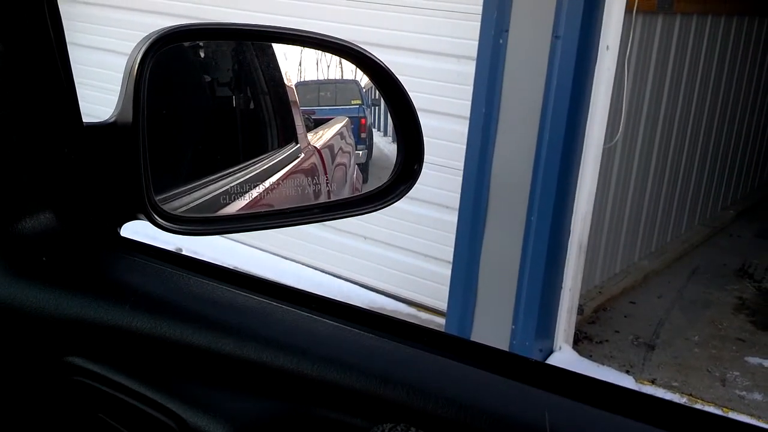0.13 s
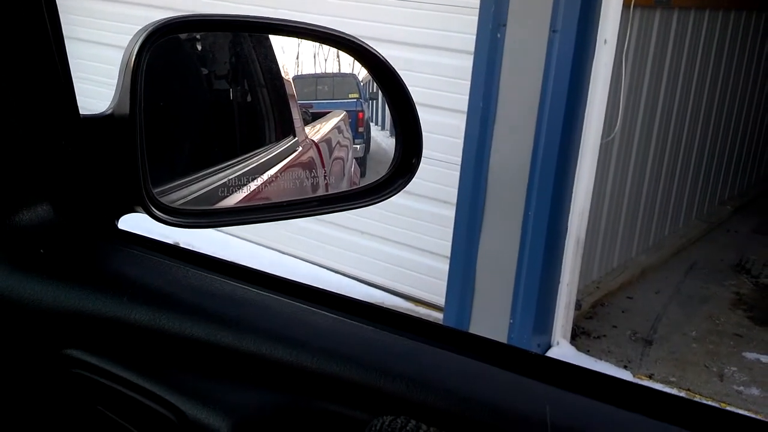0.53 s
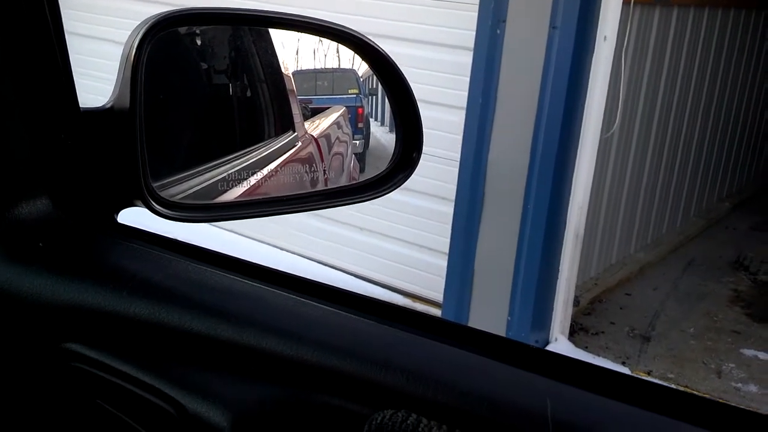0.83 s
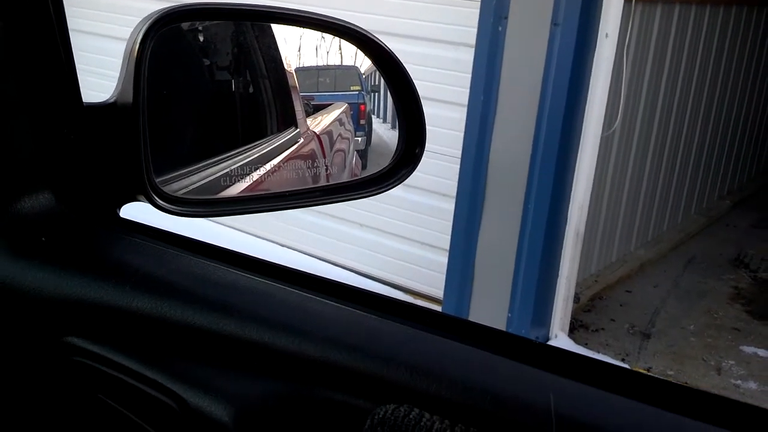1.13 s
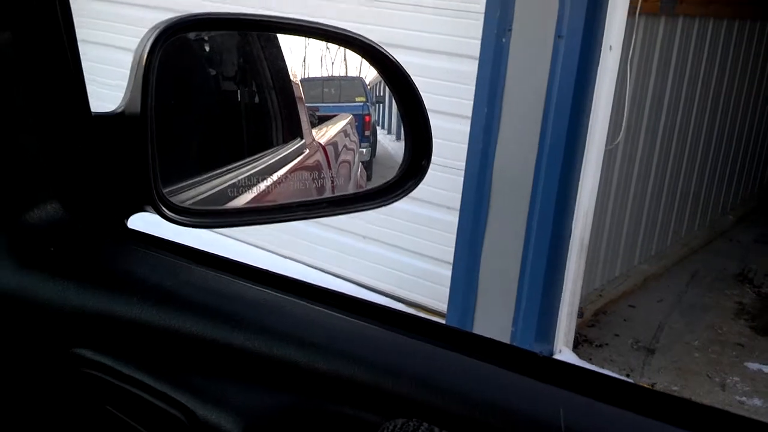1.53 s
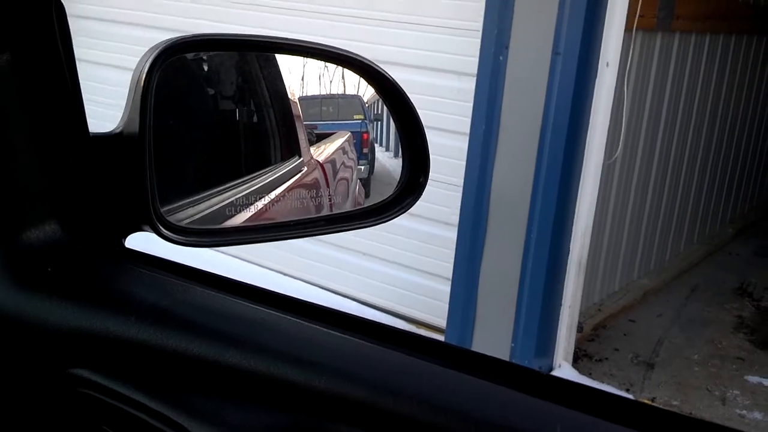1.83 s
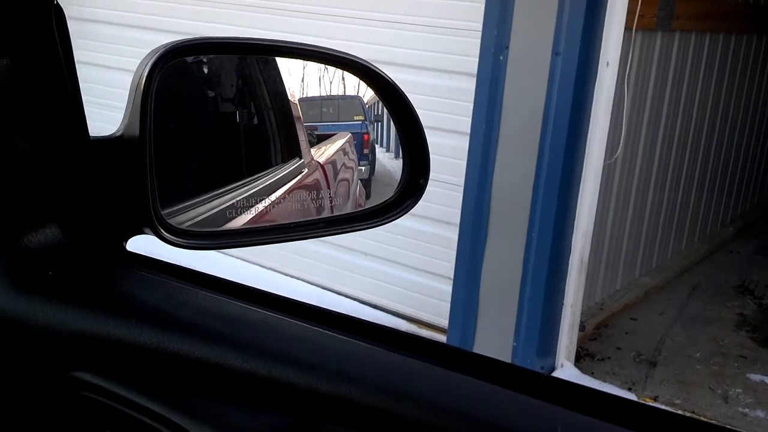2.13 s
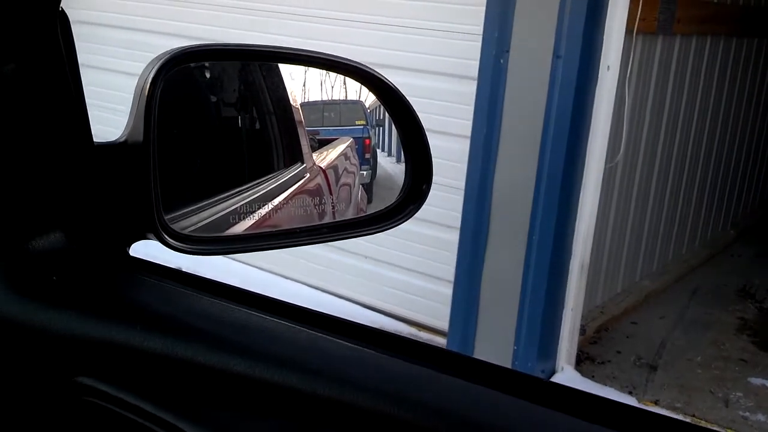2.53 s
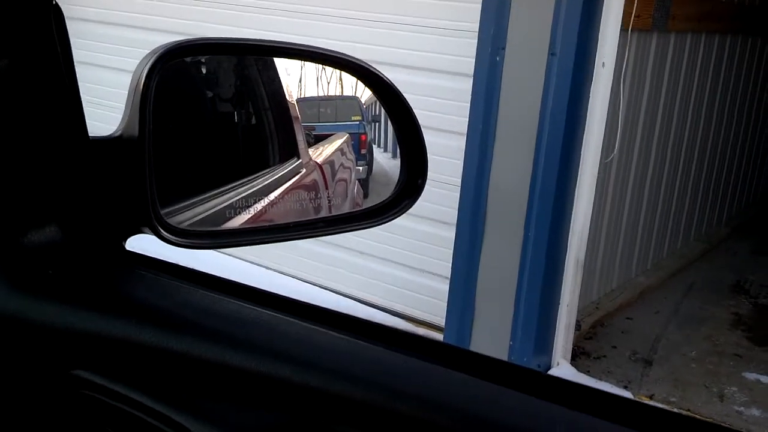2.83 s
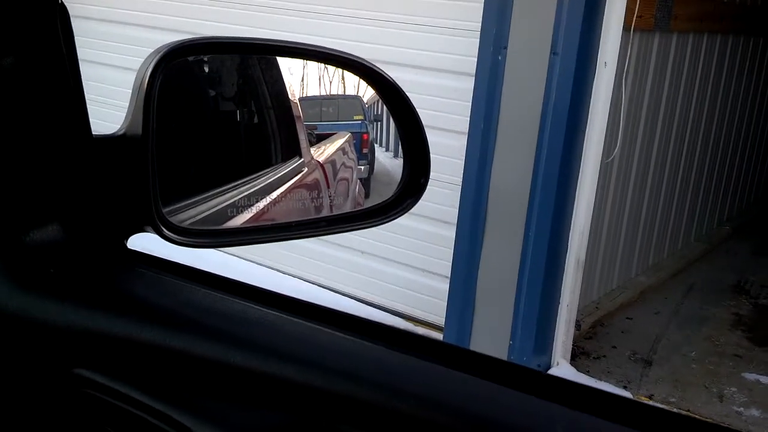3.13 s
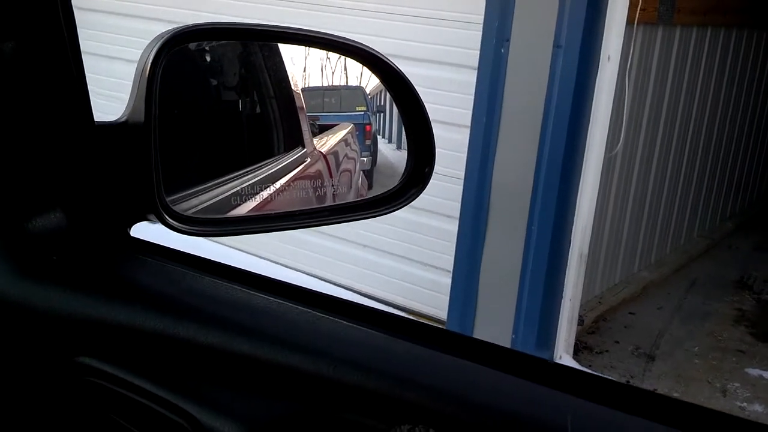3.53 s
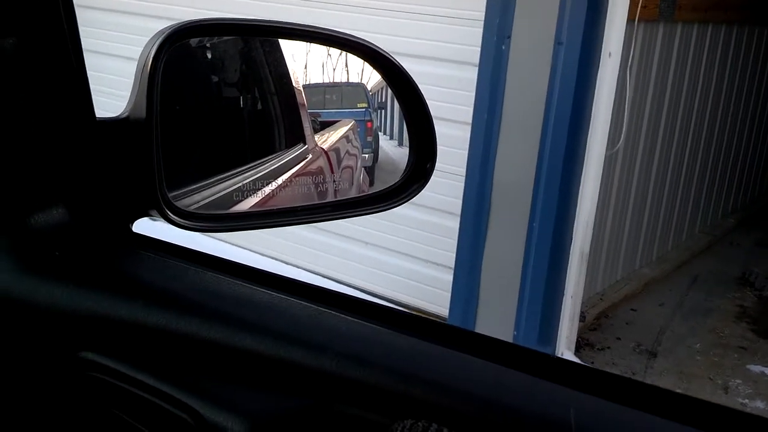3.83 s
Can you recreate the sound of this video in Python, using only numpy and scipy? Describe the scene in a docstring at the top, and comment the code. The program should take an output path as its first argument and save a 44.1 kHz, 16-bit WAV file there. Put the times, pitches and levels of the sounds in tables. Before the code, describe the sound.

A V8 pickup engine from inside the cab. Its rumble sinks by 0.5 s to a quiet lumpy idle under a faint, falling breathy whistle; air spits at 0.3 and 0.9 s. At 1.1 s it is gunned with a burst of roar and hiss, eases, with a tiny click at 1.4, then booms around 2 s. Revs surge near 2.6, 3.05 and 3.25 s, the last hissing loudest, then pitch falls, still roaring.

```python
"""V8 pickup, heard from the cab

The engine sinks to a lumpy idle, is gunned, pulls against a load, then revs in three swells.
Uneven exhaust pulses and a drone boom low down; engine bay noise roars and hisses with the firings.
A breathy intake whistle slides down in pitch, jumping up once, and a panel sings under load.
Short spits of air, a brief click of hiss and top treble, and clean firing notes stand out on top."""
import sys
import numpy as np
from scipy import signal
from scipy.fft import rfft, irfft, next_fast_len
from scipy.io import wavfile
from scipy.ndimage import uniform_filter1d, map_coordinates

SR = 44100
rng = np.random.default_rng(int(sys.argv[2]) if len(sys.argv) > 2 else 0)


def to_wav(sig):
    """Store sig (one row per channel, or 1-D mono) as 16-bit WAV at the path in sys.argv[1].

    Samples outside -1..1 are clipped; the rate is SR.
    """
    pcm = np.clip(np.atleast_2d(sig), -1, 1) * 32767
    pcm = np.round(pcm).astype(np.int16)
    wavfile.write(sys.argv[1], SR, pcm.T)  # frames by channels


N = 176400  # samples: 4 s

# Engine speed; one four-stroke cycle is eight firings: t/s, rate/(cycles per s)
SPEED = [(0, 14.9), (.33, 14.2), (.5, 12.3), (.7, 12.1), (1.12, 12.4), (1.28, 13.2), (1.4, 13.1),
         (1.5, 12.7), (1.72, 12.6), (1.85, 13.2), (2, 14.1), (2.15, 14.45), (2.38, 14.35), (2.44, 16.6),
         (2.5, 19.6), (2.63, 26.3), (2.68, 21.6), (2.76, 20.4), (2.89, 20.8), (3.02, 22.8), (3.12, 25.2),
         (3.2, 24), (3.3, 23.2), (3.42, 21.4), (3.6, 19.1), (3.8, 16.4), (4, 14.3)]
# Exhaust boom, before its small lift: t/s, level/dB
BOOM_LEVEL = [(0.01, -30.5), (0.05, -28), (0.2, -30), (0.45, -42.5), (0.7, -43.5), (0.93, -41.5),
              (1.06, -39.5), (1.11, -26), (1.28, -28), (1.4, -30), (1.62, -31), (2.05, -24.5),
              (2.38, -26.5), (2.5, -24.5), (2.72, -27), (2.84, -30), (3.24, -26), (3.65, -30), (3.8, -27.5),
              (3.97, -30)]
# Engine bay roar, before the trim of each part: t/s, level/dB
ROAR_LEVEL = [(0,-42),(.45,-49),(.6,-49),(.85,-47),(1.06,-43.5),(1.095,-31),(1.22,-31),(1.35,-33.5),(1.63,-39),(2,-34),(2.38,-34),(2.5,-26),(2.64,-21.5),(2.87,-31.5),(3.03,-20.5),(3.16,-27),(3.26,-18),(3.4,-25.5),(3.5,-23.5),(3.7,-28),(3.97,-24)]
# Rushing air, before HISS_DB: t/s, level/dB
HISS_LEVEL = [(0,-50.5),(.35,-55.5),(.45,-57.5),(.55,-57.5),(1.065,-52.5),(1.11,-34),(1.16,-34),(1.35,-40.5),(1.55,-51.5),(1.8,-54),(1.94,-50.5),(2.34,-53),(2.46,-40.5),(2.65,-34.5),(2.87,-46.5),(3.04,-36),(3.16,-38.5),(3.26,-25.5),(3.42,-38.5),(3.49,-33.5),(3.65,-40),(3.97,-34.5)]
# Top treble, before FIZZ_DB: t/s, level/dB
FIZZ_LEVEL = [(0.0, -55), (0.01, -62.5), (0.61, -70), (1.06, -59.5), (1.11, -42), (1.64, -63),
              (1.96, -58.5), (2.34, -60.5), (2.41, -51), (2.66, -41), (2.87, -55), (3.05, -41.5),
              (3.19, -45.5), (3.24, -37), (3.32, -39), (3.39, -47), (3.7, -55), (4.0, -46)]
# Clean firing note: t/s, level/dB
NOTE_LEVEL = [(2.3, -72), (2.41, -25), (2.55, -19), (2.62, -28.5), (2.655, -50), (2.69, -29), (2.78, -33.5),
              (2.9, -27), (3.03, -22.5), (3.14, -33.5), (3.23, -25), (3.32, -33.5), (3.45, -27.5),
              (3.63, -23.5), (3.78, -27.5), (3.95, -40)]

# Average strength of the eight firings of a cycle at the near tailpipe: level/dB
CYLINDERS_DB = [0, 1.5, -2.5, -5.5, 2.5, -4.5, -3.5, 3.5]
# Parts of the exhaust drone: multiple of the cycle rate (rounded when used),
# level/dB at LOW_RATE, level/dB at HIGH_RATE
ORDERS = [(5,-14,-15.5),(8,-4,-13),(9,-23,-11),(10,0.5,1),(11,-3,-2),(12,-5,-16),(13,0.5,-4),(14,-3,-10),(15,-1,-10),(16,-6,-23),(18,-3.5,-14),(19,-6.5,-7),(21,-5,-11.5)]
# Drone mixed in with the lumpy pulses: rate/(cycles per s), level/dB
DRONE_MIX = [(12, 1), (12.8, 6), (24, 4)]
# How far the drone's parts stray out of step: rate/(cycles per s), phase/rad
STRAY = [(13, 1.5), (14.3, .6), (17, 1.5)]
# Change to the drone while the throttle is shut: f/Hz, level/dB
SHUT_TONE = [(190, 0.5), (225, -15)]
# Orders that swell and fade: multiple of the cycle rate, peak t/s,
# time from the peak to 1/e of it/s, level/dB (rms of the tone before the swell shapes it)
HOWLS = [(13, 1.19, .06, -25), (16, 2.91, .07, -26), (16, 3.01, .05, -24), (18, 3.11, .05, -27),
         (18, 3.23, .07, -24.5), (19, 3.39, .05, -27), (18, 3.48, .08, -32), (10, 3.9, .1, -29)]

# Tone of the exhaust through the body: f/Hz, level/dB
BODY_COLOUR = [(25, -63), (45, -21), (60, -38), (90, -21.5), (125, -6.5), (165, 3.5), (200, -6.5),
               (250, -12), (320, -12.5), (450, -15.5), (700, -35.5), (1500, -77), (4000, -102)]
# Tone of the engine bay roar, of the air and of the top treble: f/Hz, level/dB
ROAR_COLOUR = [(60, -73), (180, -8), (300, -2), (450, 4), (700, -5), (1100, -3), (1500, -9.5), (2100, -23),
               (3200, -58), (6000, -47.5)]
HISS_COLOUR = [(400, -12), (1500, 4), (2500, 5), (3300, 0.5), (4700, -1), (5600, -10.5), (7000, -12),
               (9000, -20.5), (15500, -50.5)]
FIZZ_COLOUR = [(4000, -25.5), (7000, -4.5), (9000, -0.5), (10200, -1.5), (11800, -7), (15500, -3)]
# Narrow resonances of the cab and panels: f/Hz, width/Hz, level/dB
CAB_RESONANCES = [(360, 9.2, 1.5), (431, 15.3, 0.5), (456.4, 12, -1), (535.5, 14, -2), (551.3, 10.2, 4.5),
                  (665, 4.2, 5), (722, 4.4, 8.5), (815, 10.5, 9), (868.4, 11.7, 5), (1005.7, 24, 3),
                  (1211.7, 13.2, 9), (1400, 3.7, 14.5)]

# Intake whistle, before its random level wobble: t/s, f/Hz, level/dB
WHISTLE = [(0, 2520, -46), (.25, 2316, -55), (.58, 1944, -56), (.8, 1780, -57), (1.05, 1590, -53),
           (1.2, 2005, -60), (1.45, 1870, -52), (1.95, 1690, -53), (2.35, 1545, -57), (2.5, 1547, -80)]
# Panel that sings under load: t/s, level/dB
PANEL_LEVEL = [(1, -62), (1.18, -34.5), (1.55, -74), (2, -57), (2.33, -45), (2.45, -41), (3, -62)]
# Short spits of air at the throttle: t/s, level/dB, time to fall 60 dB/s
SPITS = [(.295, -47, 0.36), (.871, -35.5, 0.3), (1.085, -28.5, .12)]
# Tone of the spits: f/Hz, level/dB
SPIT_COLOUR = [(300, -37), (1000, 9), (1700, 8.5), (4000, -3), (9000, -13), (15000, -22)]
# Brief click, at full strength in its hiss part: t/s, level/dB, time to fall 60 dB/s
CLICKS = [(1.418, -33, .035)]
# Left minus right for everything but the diffuse part: f/Hz, level/dB
BALANCE = [(40, -16), (85, 11), (130, -20.5), (175, -6), (250, -9), (320, 8), (420, 1), (2000, 0)]

PANEL_HZ = 1418
LOW_RATE, HIGH_RATE = 13.3, 17.7  # cycles per second
CHUG_S = 2.135  # a cycle begins exactly here
GUNNED_S, OPENING_S = 1.11, 0.056  # throttle fully open at, time it takes to open
SCATTER_DB, JITTER = 1.5, 0.055  # chance in firing size, in firing time (share of the gap)
ORDER_WAVER_DB, ORDER_WAVER_RAD = 2.5, .45
SMEAR_S_PER_HZ = -.00013  # delay per Hz of pitch; negative puts higher orders earlier
DIRECT_DB = 0.5  # sound that reaches the ear past the cab resonances
WALLS_DB, WALLS_T60_S = -11, .06
PULSE_DB, RUMBLE_DB = -4, -3
ROAR_DB, BARK_DB, HISS_DB, FIZZ_DB = -1.5, -12.5, 4, 5.5
SIDE_ROAR_DB, SIDE_RUMBLE_DB = -14, -16
LAG_S, LAG_FROM_HZ = 16 / 44100, 1378
TOP_HZ = 15800


def amp(db):
    """Turn decibels into a plain multiplier."""
    return 10 ** (np.asarray(db) / 20)


def unit(x):
    """Scale x to an rms of 1."""
    return x / np.sqrt(np.mean(x ** 2) + 1e-20)


def along(points, x):
    """Read a value between (x, value) points, spaced by the logarithm of x."""
    at, value = np.transpose(points)
    return np.interp(np.log(x + 1), np.log(at + 1), value)


def curves(rows):
    """One value per sample for each column after the time."""
    s, *cols = np.transpose(rows)
    return [np.interp(np.arange(N) / SR, s, c) for c in cols]


def wobble(rate):
    """A smooth random curve with rate random points a second."""
    points = rng.standard_normal(int(N * rate / SR) + 4)
    return map_coordinates(points, [np.arange(N) * rate / SR])


def filtered(x, response):
    """Filter x by a complex response of frequency."""
    m = 2 * next_fast_len(N // 2 + SR // 4)  # spare room keeps the tail from wrapping round
    spectrum = rfft(x, m) * response(np.fft.rfftfreq(m, 1 / SR))
    return irfft(spectrum, m)[..., :N]


def coloured(x, points):
    """Give x the tone in (Hz, dB) points, with a filter that never acts ahead of time."""
    def response(hz):
        # fold the log spectrum's time curve onto one side: minimum phase
        c = irfft(np.log(amp(along(points, hz))))
        c[1:len(c) // 2] *= 2
        c[len(c) // 2 + 1:] = 0
        return np.exp(rfft(c))
    return filtered(x, response)


def steady(x, size=7000):
    """Hold the running rms of x near 1; size is in samples."""
    power = uniform_filter1d(uniform_filter1d(x ** 2, size), size // 2)
    return x / np.sqrt(np.abs(power) + 1e-12)


def firings(cycles):
    """One impulse per firing, sized by its cylinder and by chance, slightly off the beat."""
    count = len(CYLINDERS_DB)
    k = np.arange(int(cycles[0] * count) + 1, int(cycles[-1] * count))
    chance = rng.standard_normal((1000, 2))[k]
    at = np.interp((k + JITTER * chance[:, 0]) / count, cycles, np.arange(N))
    size_db = np.array(CYLINDERS_DB)[k % count] + SCATTER_DB * chance[:, 1]
    return np.bincount(at.astype(int), amp(size_db), N)


def puffs(pulses, decay_s, share):
    """White noise, a share of whose power comes as a fading puff at each firing."""
    gate = unit(signal.lfilter([1], [1, -np.exp(-1 / (decay_s * SR))], pulses))
    share = np.clip(share, 0, 1)
    return rng.standard_normal(N) * np.sqrt(1 - share + share * steady(gate) ** 2)


def walls(x):
    """Dense, quickly fading reflections of the small cab ripple the tone."""
    t = np.arange(SR // 8) / SR
    tail = rng.standard_normal(len(t)) * amp(-60 * t / WALLS_T60_S)
    tail = tail / np.linalg.norm(tail)
    return x + amp(WALLS_DB) * signal.fftconvolve(x, tail)[:N]


def cab(x):
    """A direct path plus narrow resonances that ring on in the cab and panels."""
    def response(f):
        ringing = sum(amp(db) * 1j * f * w / (c * c - f * f + 1j * f * w) for c, w, db in CAB_RESONANCES)
        return amp(DIRECT_DB) + ringing
    return filtered(x, response)


def diffuse_side(pulses):
    """Roar and rumble from all around, opposite in sign on the two sides."""
    bay = steady(coloured(puffs(pulses, decay_s=0.0086, share=0.3), ROAR_COLOUR))
    rumble = steady(coloured(puffs(pulses, decay_s=0.0067, share=0.64), BODY_COLOUR))
    side = amp(curves(ROAR_LEVEL)[0] + SIDE_ROAR_DB) * bay
    return side + amp(curves(BOOM_LEVEL)[0] + SIDE_RUMBLE_DB) * rumble


def fuzzy_tone(hz, width_hz):
    """A narrow band of noise around a pitch; width_hz sets how fast it wavers."""
    phase = 2 * np.pi * np.cumsum(hz * np.ones(N)) / SR
    return unit(wobble(width_hz) * np.sin(phase) + wobble(width_hz) * np.cos(phase))


def intake_whistle():
    """Breathy narrow-band noise with a weaker octave above, unsteady in level."""
    hz, db = curves(WHISTLE)
    octave = amp(-12) * fuzzy_tone(2 * hz, width_hz=350)
    return amp(db + wobble(14)) * (fuzzy_tone(hz, width_hz=190) + octave)


def singing_panel():
    """A panel resonance, heard as a much narrower noise band at one pitch."""
    return amp(curves(PANEL_LEVEL)[0]) * fuzzy_tone(PANEL_HZ, width_hz=24)


def bursts(rows, colour):
    """Noise that starts suddenly and dies away quickly."""
    t = np.arange(N) / SR
    level = sum((t > s) * amp(db - 60 * np.abs(t - s) / t60) for s, db, t60 in rows)
    return level * unit(coloured(rng.standard_normal(N), colour))


def spits_and_clicks():
    """Spits of air at the throttle, and a brief click of hiss and top treble."""
    click = .6 * bursts(CLICKS, FIZZ_COLOUR) + bursts(CLICKS, HISS_COLOUR)
    return bursts(SPITS, SPIT_COLOUR) + click


def hiss(pulses):
    """Rushing air, partly chopped by the firings, with a grainy fizz on top."""
    grain = amp(0.91 * wobble(1200) + 0.89 * wobble(35))
    air = walls(puffs(pulses, decay_s=0.0041, share=0.18) * grain)
    fizz_grain = amp(0.97 * wobble(900) + 1.4 * wobble(14))
    fizz = unit(coloured(air * fizz_grain, FIZZ_COLOUR))
    rush = unit(coloured(air, HISS_COLOUR))
    return amp(curves(HISS_LEVEL)[0] + HISS_DB) * rush + amp(curves(FIZZ_LEVEL)[0] + FIZZ_DB) * fizz


def roar(pulses):
    """Puffs of noise and hard firing knocks ring the cab."""
    bay = steady(cab(coloured(puffs(pulses, decay_s=0.0019, share=0.23), ROAR_COLOUR)))
    bark = steady(cab(coloured(pulses, ROAR_COLOUR)))
    return amp(curves(ROAR_LEVEL)[0]) * (amp(ROAR_DB) * bay + amp(BARK_DB) * bark)


def howl(cycles):
    """Tones locked to the engine: the firing note sings through the revs, other orders swell and fade."""
    t = np.arange(N) / SR

    def tone(order):
        wave = np.sin(2 * np.pi * order * cycles + .12 * wobble(12))
        return unit(amp(wobble(20)) * wave)

    out = amp(curves(NOTE_LEVEL)[0]) * tone(len(CYLINDERS_DB))
    for order, peak_s, half_s, db in HOWLS:
        swell = np.exp(-((t - peak_s) / half_s) ** 2)
        out += amp(db) * swell * tone(order)
    return out


def drone(rate, cycles):
    """Many tones at multiples of the cycle rate burble, and chug once a cycle where they fall in step."""
    high = np.clip((rate - LOW_RATE) / (HIGH_RATE - LOW_RATE), 0, 1)
    shut = np.clip((GUNNED_S - np.arange(N) / SR) / OPENING_S, 0, 1)  # 1 shut, 0 open
    out = np.zeros(N)
    for order, low_db, high_db in ORDERS:
        k = round(order)
        turns = k * cycles - SMEAR_S_PER_HZ * (k * rate) ** 2 / 2
        db = low_db + high * (high_db - low_db) + shut * along(SHUT_TONE, k * rate)
        stray = along(STRAY, rate) * wobble(1) + ORDER_WAVER_RAD * wobble(10)
        out += amp(db + ORDER_WAVER_DB * wobble(9)) * np.cos(2 * np.pi * turns + stray)
    return steady(out)


def exhaust(rate, cycles, pulses):
    """Lumpy pulses and gas puffs boom through the body; a speed-dependent share of drone joins them."""
    thumps = amp(PULSE_DB) * steady(coloured(pulses, BODY_COLOUR))
    gas = puffs(pulses, decay_s=0.013, share=0.45)
    rumble = amp(RUMBLE_DB) * steady(coloured(gas, BODY_COLOUR))
    boom = thumps + rumble + amp(along(DRONE_MIX, rate)) * drone(rate, cycles)
    return amp(curves(BOOM_LEVEL)[0] + 0.86) * steady(boom)  # 0.86 dB lift


def scene():
    """One crankshaft times the engine layers; whistle, panel and bursts keep their own times."""
    rate, = curves(SPEED)
    cycles = np.cumsum(rate) / SR
    cycles += -cycles[int(CHUG_S * SR)] % 1
    pulses = firings(cycles)
    truck = intake_whistle() + singing_panel() + spits_and_clicks()
    truck += hiss(pulses) + roar(pulses) + howl(cycles) + exhaust(rate, cycles, pulses)
    side = diffuse_side(pulses)

    def lean(hz):
        # left and right gains always add up to 2
        return 2 / (1 + amp(along(BALANCE, hz) * np.array([[-1], [1]])))

    return filtered(truck, lean) + np.array([side, -side])


def record(dry):
    """The microphone pair hears the right side's treble later and keeps nothing from TOP_HZ up."""
    def response(hz):
        # half the lag goes to each side: left earlier, right later
        turn = np.pi * LAG_S * np.maximum(hz - LAG_FROM_HZ, 0) * np.array([[1], [-1]])
        return np.exp(1j * turn) * (hz < TOP_HZ)
    return filtered(dry, response)


dry = scene()
out = record(dry)
to_wav(out)
```